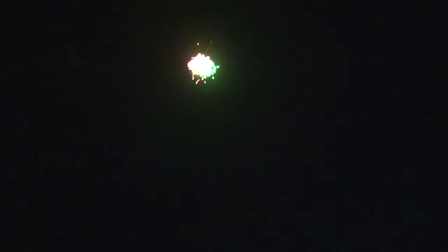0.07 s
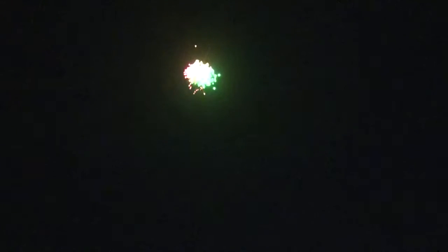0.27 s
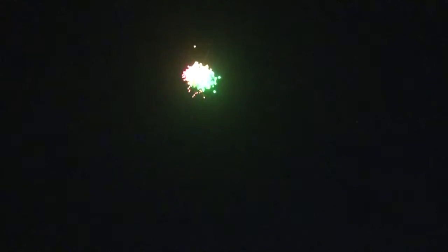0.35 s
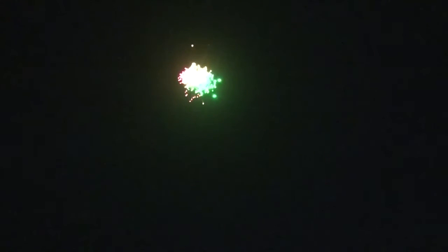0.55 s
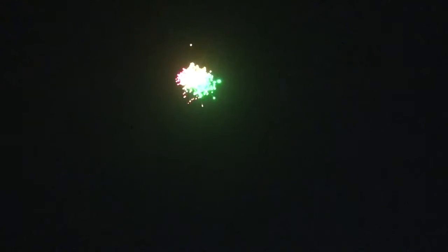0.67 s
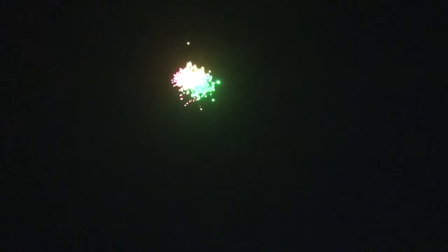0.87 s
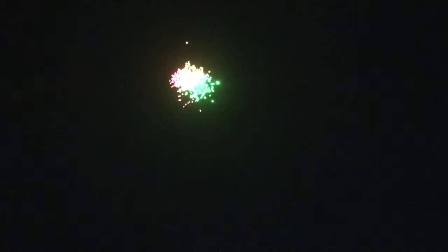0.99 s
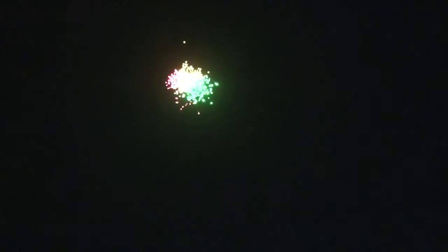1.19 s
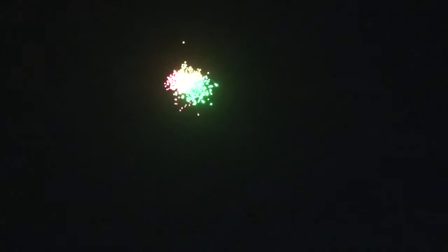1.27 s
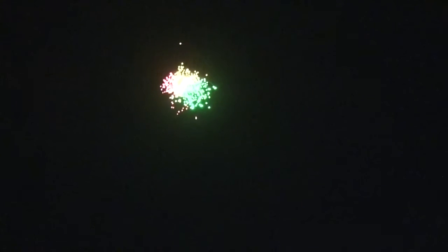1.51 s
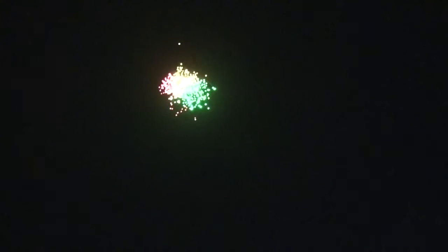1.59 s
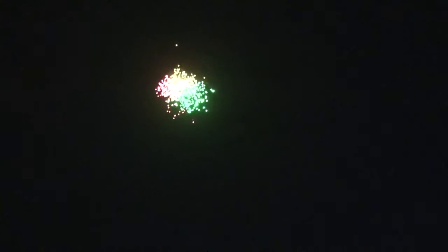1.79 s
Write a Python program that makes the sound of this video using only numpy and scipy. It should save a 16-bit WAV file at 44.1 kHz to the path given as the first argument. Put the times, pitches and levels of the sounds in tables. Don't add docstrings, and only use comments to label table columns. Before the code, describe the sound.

A firework shell bursts overhead with one sharp, loud crack, then rumbling, hissing echoes roll away.

```python
import sys
import numpy as np
from scipy import signal
from scipy.fft import rfft, irfft
from scipy.io import wavfile
from scipy.ndimage import uniform_filter1d

SR = 44100
rng = np.random.default_rng(int(sys.argv[2]) if len(sys.argv) > 2 else 0)


def level_to_linear(level):
    exponent = np.asarray(level, float) / 20
    return 10 ** exponent


def int16_out(signal):
    q = np.round(np.clip(np.atleast_2d(signal).T, -1, 1) * 32767)
    wavfile.write(sys.argv[1], SR, q.astype(np.int16))


N = 81585
BURST_S = .205


def unit(x):
    return x / np.sqrt(np.mean(x ** 2))


def cut(x, hz, kind, order=2):
    sos = signal.butter(order, np.clip(hz, 10, .45 * SR), kind, fs=SR, output="sos")
    return signal.sosfilt(sos, x)


def noise():
    return rng.standard_normal(N)


def colour_db(table, hz):
    table_hz, table_db = np.array(table).T
    return np.interp(np.log(hz), np.log(table_hz), table_db)


def tap(at_s):
    k = np.arange(N) - at_s * SR
    return np.sinc(k) * np.exp(-(k / 6) ** 2)


def walk(rate_hz):
    hold = int(SR / rate_hz)
    steps = np.repeat(rng.standard_normal(N // hold + 1), hold)
    smooth = uniform_filter1d(uniform_filter1d(steps, hold), hold)
    return unit(smooth[:N])


RISE_S, RAMP_S, RETURN_S, SUCTION = .0003, .0021, .0006, .33
MIC_HZ, MIC_WIDTH_HZ = 197, 225


def blast():
    corners_s = np.cumsum([0, RISE_S, RAMP_S, RETURN_S])
    wave = np.interp(np.arange(2048) / SR, corners_s, [0, -1, SUCTION, 0])
    mic = [1, 2 * np.pi * MIC_WIDTH_HZ, (2 * np.pi * MIC_HZ) ** 2]
    b, a = signal.bilinear([1, 0, 0], mic, SR)
    return signal.lfilter(b, a, wave)


BURST_DB = 5
CRACK_DB, CRACK_LEAD_S, CRACK_HZ, CRACK_PAN = -13, .00029, 2200, .14
RING_HZ, RING_WIDTH_HZ, RING_DB = 2300, 1300, 3
ECHO_GROUND_S, ECHO_GROUND_DB = .0021, -12.5
# delay/s, level/dB, top f/Hz
NEAR_BOUNCES = [(.0009, -12, 7000), (.0019, -15, 1200), (.0058, -6.5, 10000), (.0067, -8.5, 6000),
                (.0087, -18, 2000), (.0122, -18, 1200), (.0152, -19, 1300)]
# t/s, level/dB, top f/Hz, pan/-1..1
WALL_ECHOES = [(.2522, -15, 1300, -.5), (0.2881, -25.5, 580, 0.11), (0.3975, -28.5, 544, -0.16),
               (0.405, -27, 840, -0.086), (0.4349, -22, 606, -0.0033), (0.4426, -27, 710, -.3),
               (0.539, -33, 604, 0), (0.597, -27, 250, 0), (0.751, -29, 610, 0.14), (.788, -34.5, 800, 0),
               (0.8267, -20, 650, 0), (0.8446, -32.5, 900, 0), (0.861, -40.5, 1500, 0),
               (0.931, -31, 400, 0), (0.9336, -26, 500, 0), (1.005, -28.5, 550, .2), (1.013, -35, 400, .2),
               (1.404, -40, 500, .3), (1.418, -33.5, 560, .3), (1.503, -39, 500, .3), (1.5437, -34, 606, 0)]


def report(wave):
    crack = cut(tap(BURST_S - CRACK_LEAD_S), [CRACK_HZ, 4 * CRACK_HZ], "band", order=1)
    crack = level_to_linear(CRACK_DB) * crack / crack.max()

    path = tap(BURST_S)
    for delay_s, db, top_hz in NEAR_BOUNCES:
        path = path + level_to_linear(db) * cut(tap(BURST_S + delay_s), top_hz, "low")
    ring_band_hz = [RING_HZ - RING_WIDTH_HZ / 2, RING_HZ + RING_WIDTH_HZ / 2]
    path = path + level_to_linear(RING_DB) * cut(path, ring_band_hz, "band", order=1)

    mid_path, side_path = path, .075 * path
    for at_s, db, top_hz, pan in WALL_ECHOES:
        pair = tap(at_s) + level_to_linear(ECHO_GROUND_DB) * tap(at_s + ECHO_GROUND_S)
        echo = level_to_linear(db) * cut(pair, top_hz, "low", order=3)
        mid_path = mid_path + echo
        side_path = side_path + pan * echo

    mid = signal.fftconvolve(mid_path, wave)[:N] + crack
    side = signal.fftconvolve(side_path, wave)[:N] + CRACK_PAN * crack
    return level_to_linear(BURST_DB) * mid, level_to_linear(BURST_DB) * side


BUMPS_PER_S, BUMP_SPREAD_DB, BUMP_TOP_HZ = 650, 1.5, 468
DEEP_DB, DEEP_HZ, DEEP_FADE_DB_PER_S = -2, 177, 1.5


def ground_rumble(wave, t):
    chance, size = rng.random((2, N))
    bumps = (chance < BUMPS_PER_S / SR) * level_to_linear(-BUMP_SPREAD_DB * np.log(size + .04))
    copies = signal.fftconvolve(bumps - bumps.mean(), wave)[:N]
    rumble = unit(cut(copies, BUMP_TOP_HZ, "low", order=4))
    deep_db = DEEP_DB - DEEP_FADE_DB_PER_S * t + 2.8 * walk(25)
    return rumble + level_to_linear(deep_db) * unit(cut(noise(), [70, DEEP_HZ], "band"))


AIR_DB_PER_S, AIR_POWER = 9.5, 2.35
GRAIN_DB, GRAIN_PER_S = 1.5, 120
WIDE_DB_PER_OCTAVE = 3
# f/Hz, level/dB per Hz
FOLIAGE_SPECTRUM = [(500, 6), (750, 4.5), (1300, 2), (2500, -3.5), (3500, -6.5), (5300, -13.5), (8000, -26),
                    (13000, -46)]


def foliage_hiss(t):
    hiss, wide = 0, 0
    puffs_db = GRAIN_DB * walk(GRAIN_PER_S)
    for hz in 500 * 2 ** np.arange(0, 4.8, .2):
        air_db = -AIR_DB_PER_S * (hz / 5000) ** AIR_POWER * np.maximum(t - BURST_S, 0)
        gain = level_to_linear(colour_db(FOLIAGE_SPECTRUM, hz) + air_db + puffs_db + walk(40) + 8.5)
        band_hz = [hz / 2 ** .1, hz * 2 ** .1]
        hiss = hiss + gain * cut(noise(), band_hz, "band", order=3)
        wide_gain = gain * level_to_linear(WIDE_DB_PER_OCTAVE * np.log2(hz / 1000))
        wide = wide + wide_gain * cut(noise(), band_hz, "band", order=3)
    return hiss, wide


WIDE_DB = -14
# t/s, level/dB, solid ground against foliage/dB, pan/dB
SCATTER = [(.217, -30, 8.5, 3.5), (.242, -45.5, 15, -5.5), (.315, -46.5, 9.5, -3.5), (.345, -58.5, 14.5, 2),
           (.39, -62.5, 11, 2), (.408, -50, 14, -5), (.545, -46.5, 7, 0), (.575, -53.5, 14, 2),
           (.665, -55.5, 12.5, 2.5), (.69, -45.5, 3.5, 1), (.77, -49, 2.5, 0.5), (.865, -45.5, 6, 0.5),
           (.9, -51, 10, 2), (1.18, -57, 5, 2.5), (1.3, -53, 8, 3.5), (1.66, -53, 5.5, 4.5),
           (1.825, -63.5, 11, 3), (1.85, -52, -2, 0)]


def landscape(wave, t):
    at_s, *columns = np.array(SCATTER).T
    level_db, solid_db, pan_db = (np.interp(t, at_s, column) for column in columns)
    level = np.clip((t - BURST_S) / .005, 0, 1) * level_to_linear(level_db)
    rumble = ground_rumble(wave, t) * level_to_linear(solid_db - 2.5)
    hiss, wide = foliage_hiss(t)
    mid = level * (rumble + hiss)
    return mid, mid * np.tanh(pan_db * np.log(10) / 40) + level_to_linear(WIDE_DB) * level * wide


RUSTLE_PAN, RUSTLE_HISS_DB = -0.63, -4.5
# t/s, level/dB, ring f/Hz, decay/s
SCRATCHES = [(1.52, -54.5, 3020, .002), (1.5238, -49, 5360, 0.0019), (1.5355, -45.5, 2220, 0.0046),
             (1.5408, -55, 4200, 0.0057), (1.5582, -48.5, 4800, 0.0024), (1.5686, -48.5, 4170, .002),
             (1.578, -47, 2000, 0.004), (1.5816, -46.5, 2200, 0.0033), (1.178, -68, 7800, 0.00078),
             (1.214, -72, 9100, 0.00074)]


def rustle(t):
    out = 0
    for at_s, db, hz, decay_s in SCRATCHES:
        u = np.maximum(t - at_s, 0)
        rough = noise() * level_to_linear(3.4 * noise())
        burst = rough * np.minimum(u / .0016, 1) * np.exp(-u / decay_s)
        ring = 4.64 * cut(burst, [hz * .71, hz * 1.174], "band")
        hiss = level_to_linear(RUSTLE_HISS_DB) * cut(burst, [1600, 8000], "band")
        out = out + level_to_linear(db) * (ring + hiss)
    return out, RUSTLE_PAN * out


# f/Hz, first chirp t/s, period/s, chirp/s, level/dB
CRICKET_SONGS = [
    (2285, .030, .125, .027, -62),
    (2285, .061, .125, .028, -61),
    (5050, .035, .043, .022, -80),
    (2520, .008, .06, .03, -76),
]


def crickets(t):
    mid, side = 0, 0
    for k, (f_hz, first_s, period_s, chirp_s, db) in enumerate(CRICKET_SONGS):
        u = np.clip(((t - first_s) % period_s) / chirp_s, 0, 1)
        level = level_to_linear(db + 1.33 * walk(60)) * np.sin(np.pi * u) ** .5
        pitch_hz = f_hz * (1 + .0043 * walk(88) - .0033 * u)
        song = level * np.sin(2 * np.pi * np.cumsum(pitch_hz) / SR)
        mid = mid + song
        side = side + .16 * (k > 1) * song
    return mid, side


CHORUS_HZ, CHORUS_DB = 4800, -78


def chorus():
    band = cut(noise(), [CHORUS_HZ * .93, CHORUS_HZ * 1.07], "band")
    return level_to_linear(CHORUS_DB + 2 * walk(30)) * unit(band)


NIGHT_DB = -63.5
# f/Hz, level/dB per Hz
NIGHT_SPECTRUM = [(30, 1.5), (70, 2.5), (200, -10.5), (500, -19), (1960, -22), (4900, -31), (8000, -38.5),
                  (16000, -41.5)]


def night_air():
    hz = np.maximum(np.fft.rfftfreq(N, 1 / SR), 1)
    spectrum = rfft(noise()) * level_to_linear(colour_db(NIGHT_SPECTRUM, hz))
    return level_to_linear(NIGHT_DB) * unit(irfft(spectrum, N))


DUCK_DB, RECOVER_S = -10, 3.


def night(t):
    song_mid, song_side = crickets(t)
    mid = night_air() + song_mid + chorus()
    side = night_air() + song_side + chorus()
    duck = level_to_linear(DUCK_DB * (t > BURST_S) * np.exp(-(t - BURST_S) / RECOVER_S))
    return mid * duck, .6 * cut(side, 7000, "low", order=1) * duck


SIDE_HZ = 420


def scene():
    t, wave = np.arange(N) / SR, blast()
    layers = [report(wave), landscape(wave, t), rustle(t), night(t)]
    mid, side = np.sum(layers, axis=0)
    side = signal.sosfiltfilt(signal.butter(2, SIDE_HZ, "high", fs=SR, output="sos"), side)
    return np.array([mid + side, mid - side])


def low_pass(x):
    return signal.sosfilt(signal.butter(12, 16880, fs=SR, output="sos"), x)


CLIP, TOP_HZ = .6, 15600


def record(dry):
    flat = dry / (1 + np.abs(dry / CLIP) ** 4) ** (1 / 4)
    mix = cut(flat, TOP_HZ, "low", order=8)
    return low_pass(mix)


dry = scene()
out = record(dry)
int16_out(out)
```